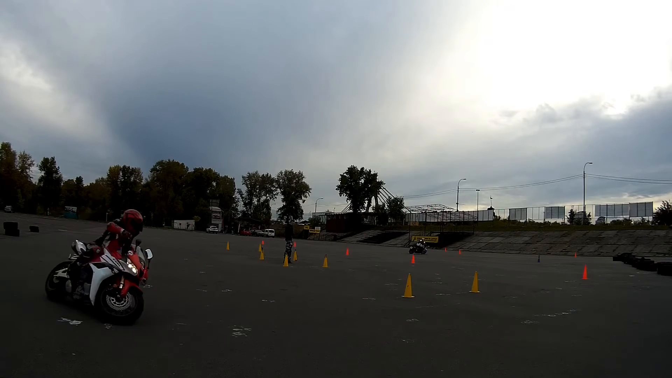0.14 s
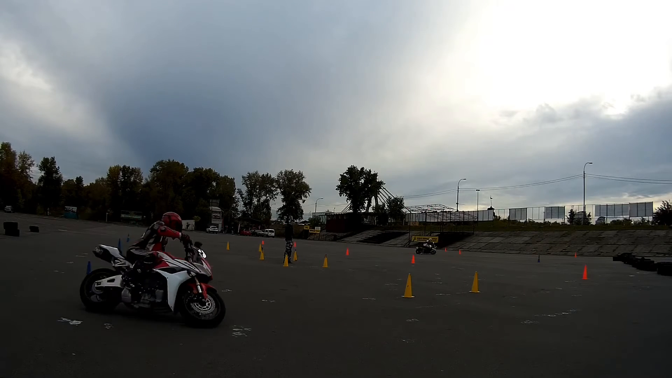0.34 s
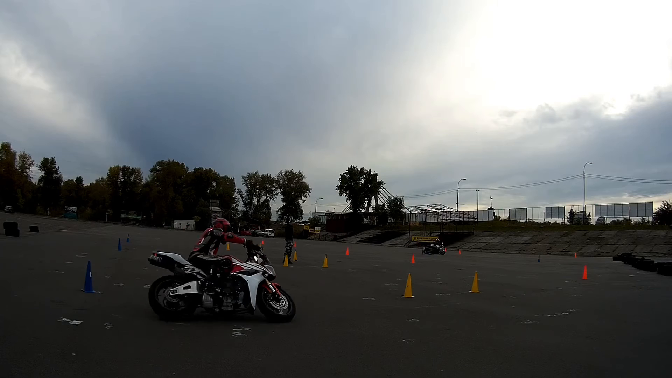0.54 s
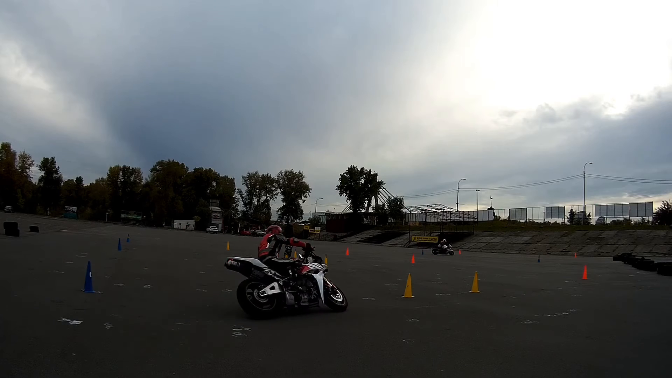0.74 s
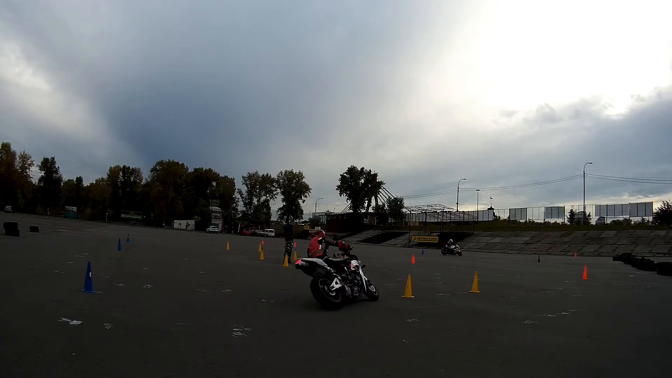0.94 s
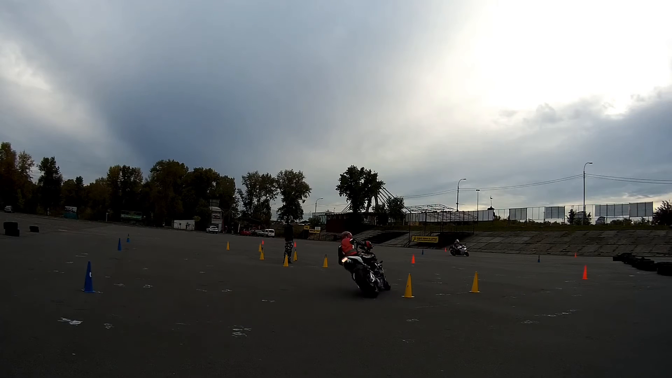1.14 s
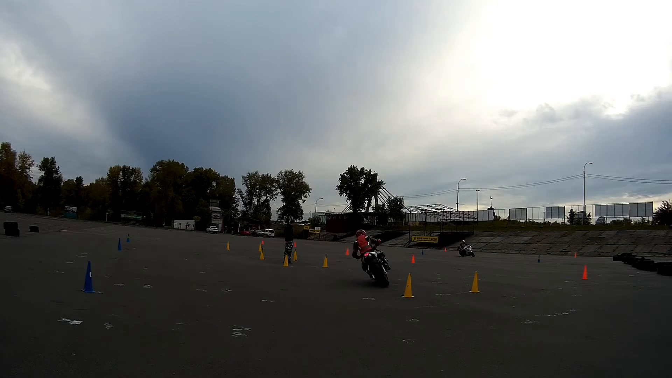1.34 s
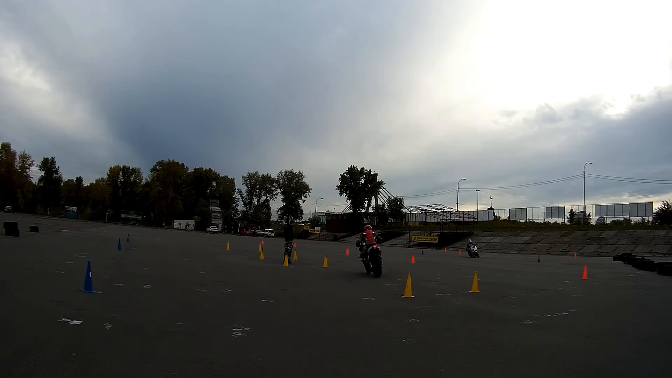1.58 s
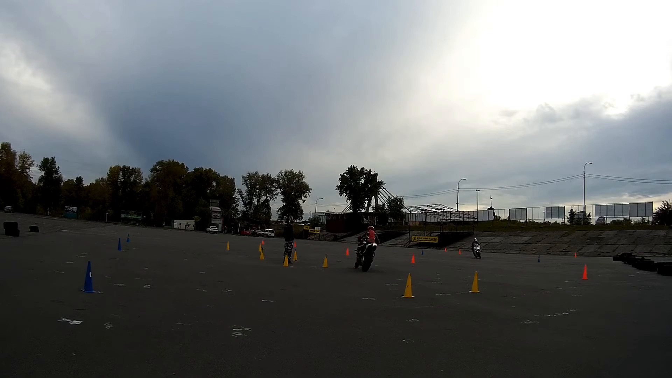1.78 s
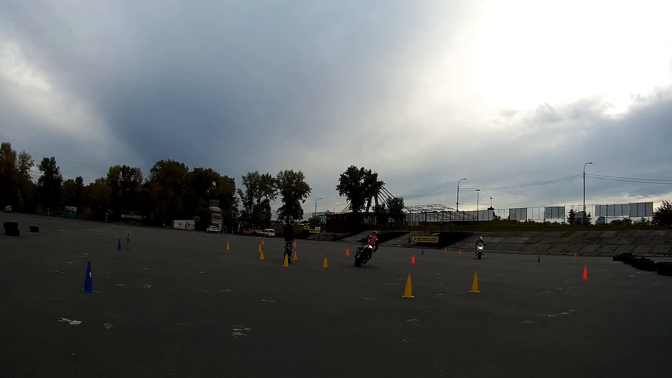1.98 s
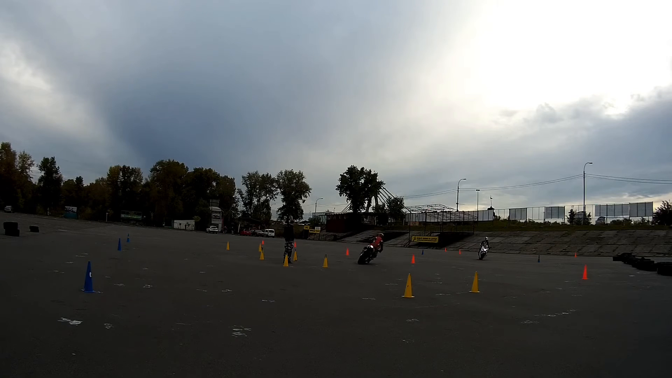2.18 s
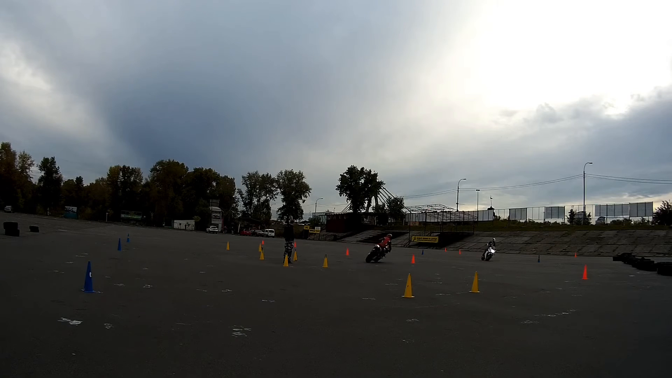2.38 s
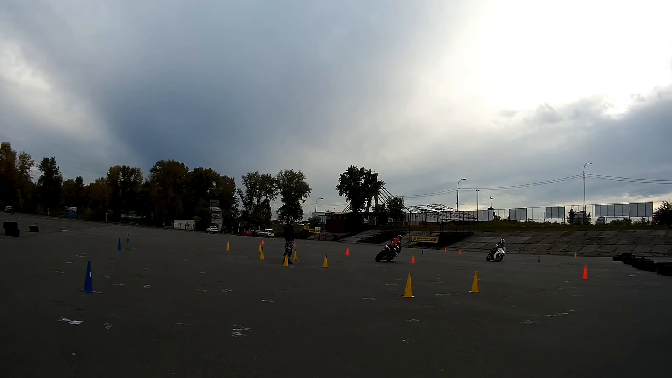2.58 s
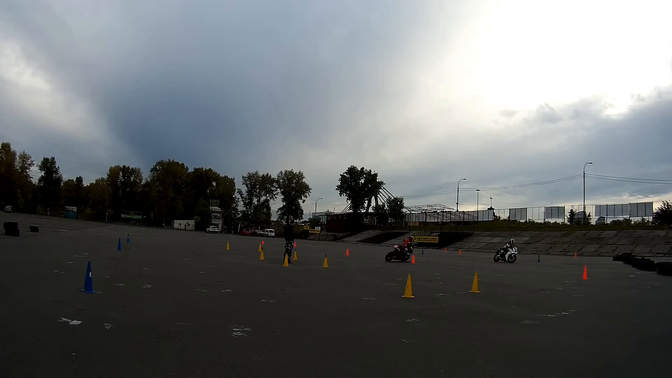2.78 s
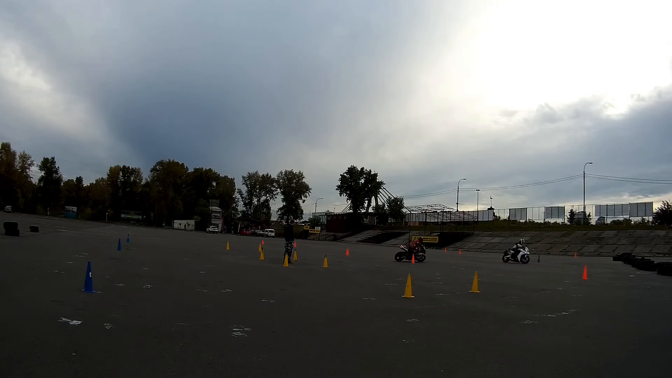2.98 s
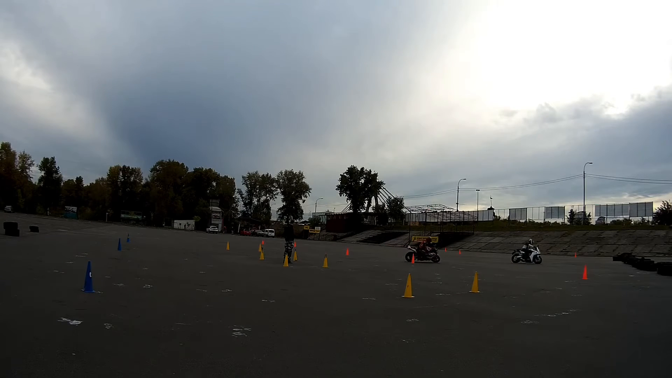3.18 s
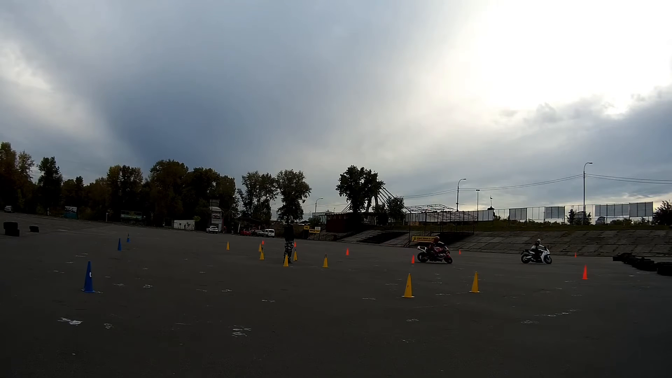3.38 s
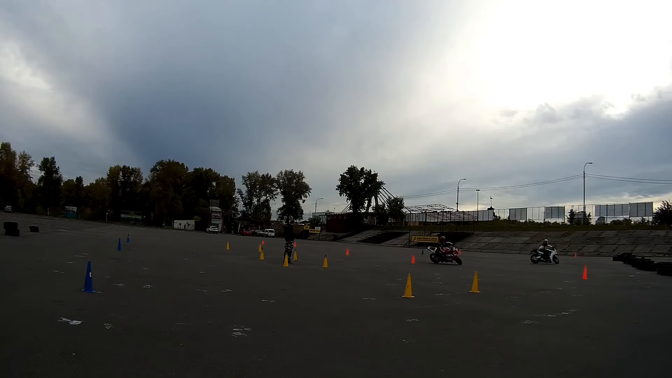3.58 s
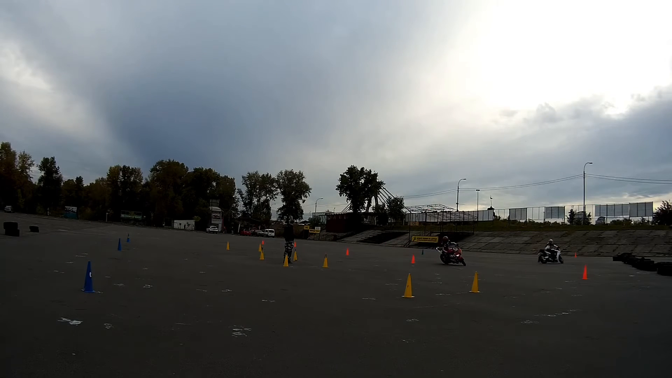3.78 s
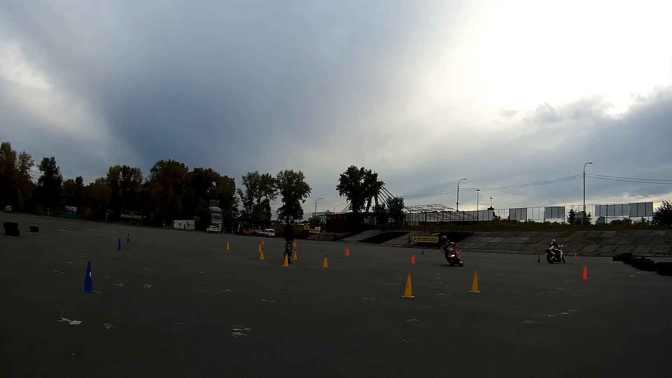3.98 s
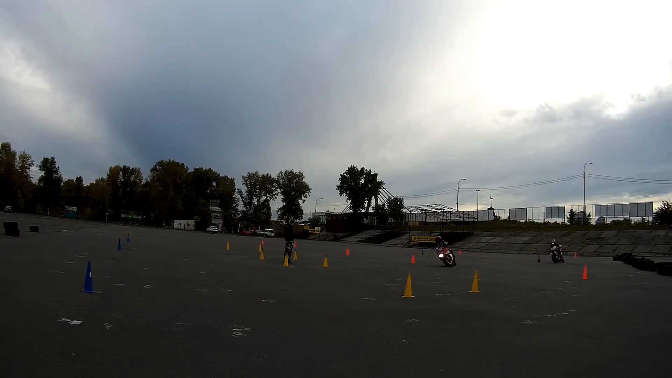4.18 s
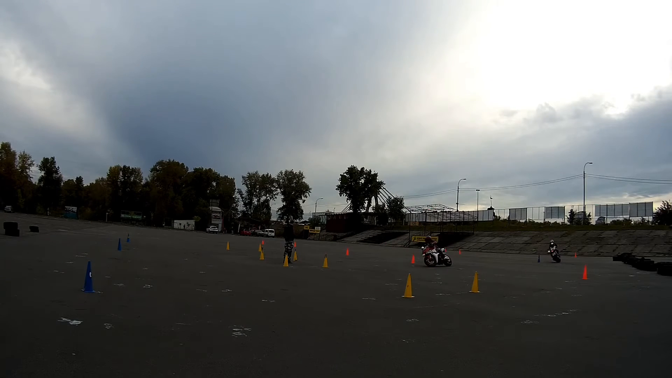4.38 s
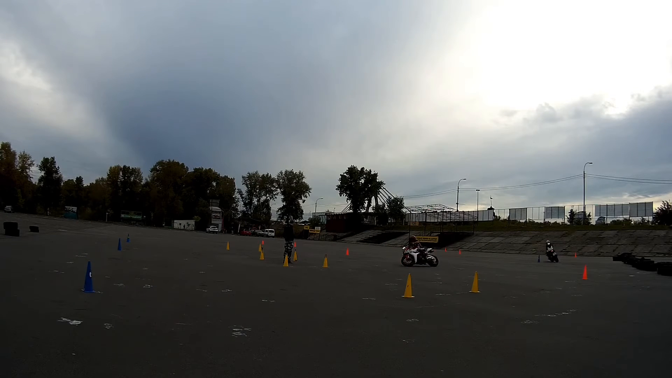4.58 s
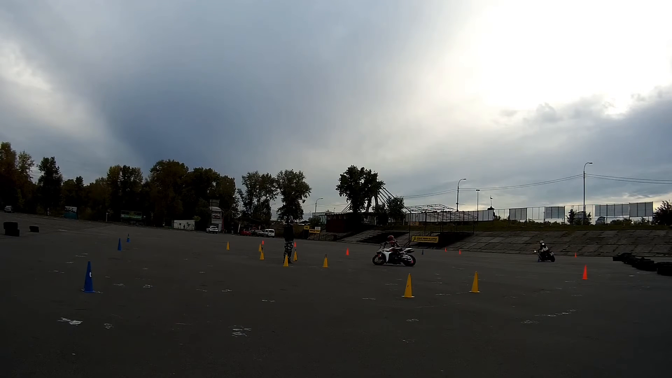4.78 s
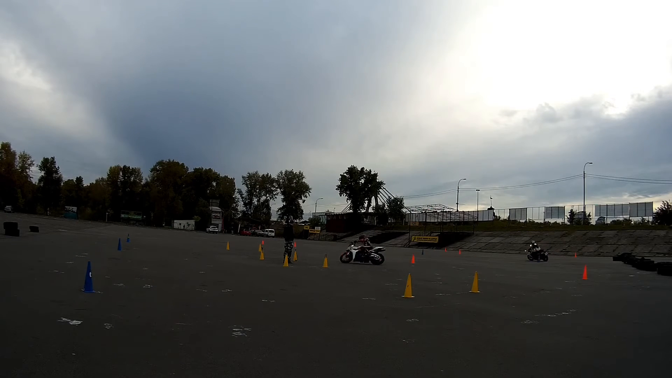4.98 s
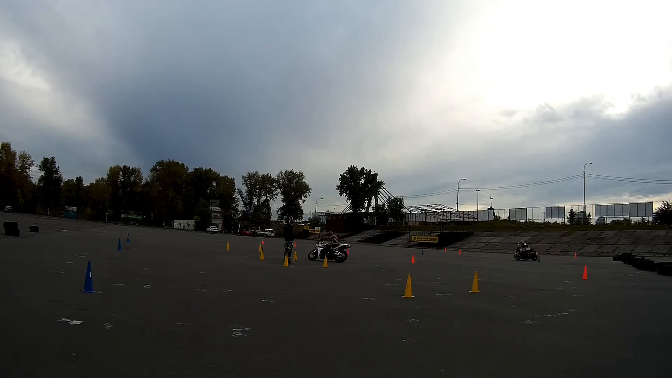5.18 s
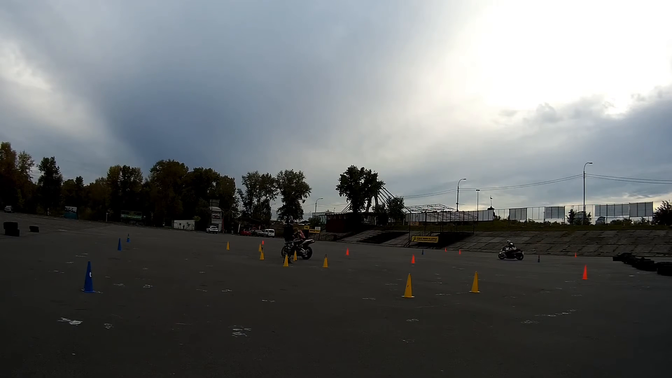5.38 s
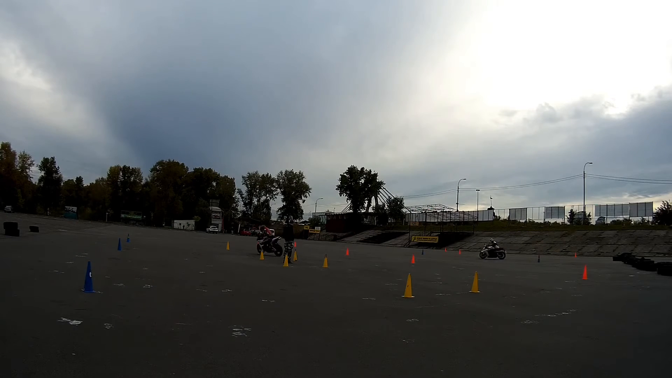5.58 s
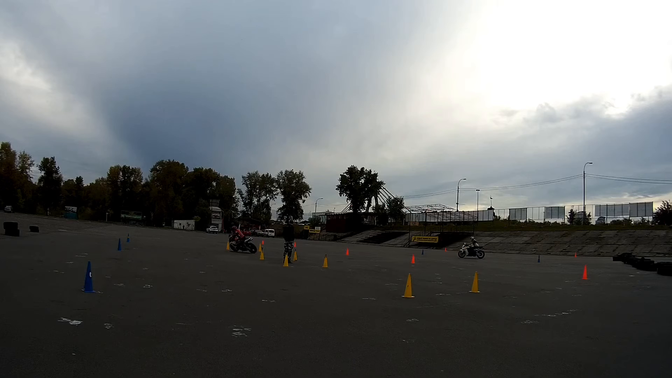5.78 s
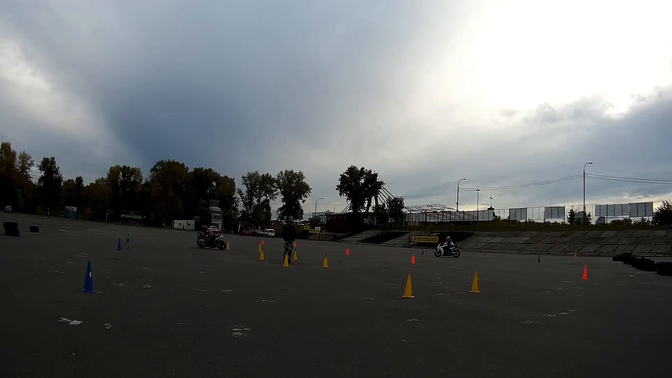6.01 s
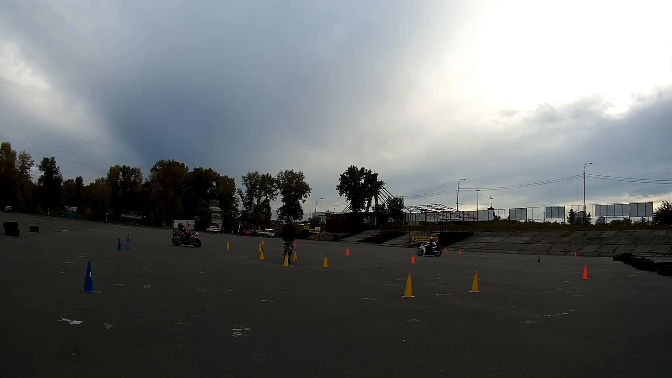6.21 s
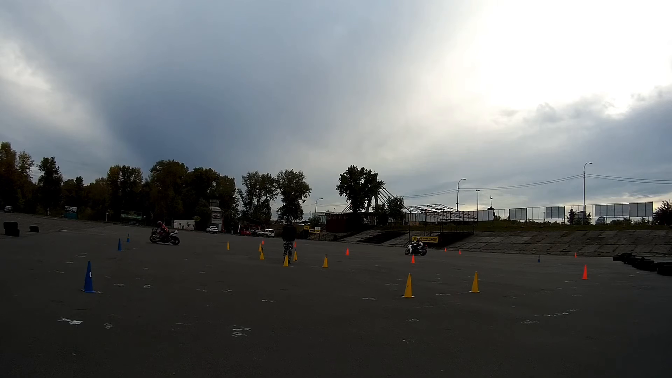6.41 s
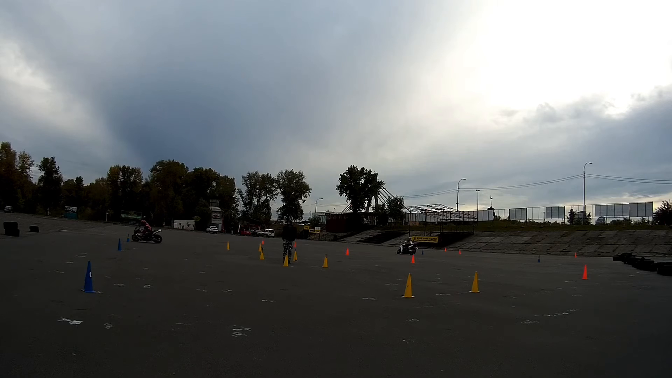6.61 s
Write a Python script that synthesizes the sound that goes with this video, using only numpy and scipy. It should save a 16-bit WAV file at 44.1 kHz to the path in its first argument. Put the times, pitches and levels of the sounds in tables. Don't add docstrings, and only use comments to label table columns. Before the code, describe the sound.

A sport bike's engine swells and rises in pitch during a close pass, with rough exhaust roar and thin chain whine, then snaps off the throttle and drops down. It idles low through a distant turn, revs again with short stabs and winds down. Muffled outdoor pickup, with little treble, low far-off engine and traffic murmur, light hiss and a brief faint electronic buzz near the end.

```python
import sys
import numpy as np
from scipy import signal
from scipy.fft import rfft, irfft
from scipy.io import wavfile
from scipy.ndimage import uniform_filter1d

SR = 44100
rng = np.random.default_rng(int(sys.argv[2]) if len(sys.argv) > 2 else 0)


def generate_wav(sig):
    pcm = np.round(np.clip(np.atleast_2d(sig).T, -1, 1) * 32767).astype(np.int16)
    wavfile.write(sys.argv[1], SR, pcm)


def volts_from_decibels(level):
    exponent = np.asarray(level, float) / 20
    return 10 ** exponent


N = 293265
T = np.arange(N) / SR


def evened(x):
    return x / np.sqrt(np.mean(x ** 2) + 1e-20)


def read(points, hz):
    f, value = np.transpose(points)
    return np.interp(np.log(hz + 1), np.log(f + 1), value)


def played(rows):
    s, *columns = np.transpose(rows)
    return [uniform_filter1d(np.interp(T, s, c), size=500, mode="nearest") for c in columns]


def noise(points):
    z = rfft(rng.standard_normal(N))
    gain = volts_from_decibels(read(points, np.fft.rfftfreq(N, 1 / SR)))
    return evened(irfft(z * gain, N))


def drift(hz):
    b, a = signal.butter(2, hz, fs=SR / 64)
    coarse = signal.lfilter(b, a, rng.standard_normal(N // 64 + 2))
    return evened(np.interp(np.arange(N) / 64, np.arange(len(coarse)), coarse))


def band_rms(x, lo, hi):
    sos = signal.butter(4, [lo, hi], "band", fs=SR, output="sos")
    return np.std(signal.sosfilt(sos, x))


# (frequency [Hz], gain [dB])
PIPE = [(40, -12), (100, -11.5), (180, -4), (250, -15.5), (300, -15.5), (365, -3), (420, -10), (490, -26),
        (600, -22), (700, -22), (850, -26.5), (1100, -37), (1700, -38.5), (2800, -54)]


def pipe_phase(hz):
    grid = np.abs(np.fft.fftfreq(8192, 1 / SR))
    lag = -signal.hilbert(np.log(volts_from_decibels(read(PIPE, grid)))).imag
    return np.interp(hz, grid[:4096], lag[:4096])


def stack(rate, levels):
    turns = 2 * np.pi * np.cumsum(rate) / SR
    total = 0
    for k, gain in levels:
        smear = 0.25 * max(k - 5, 0) ** 2
        phase = k * turns + pipe_phase(k * rate) + np.pi / 2 - smear
        total = total + np.sqrt(2) * gain * np.cos(phase)
    return total


# (time [s], firing rate [Hz])
SPEED = [(0, 80.4), (.16, 80.34), (.41, 98.05), (.59, 119.6), (1.13, 183.4), (1.33, 198.6), (1.92, 167.1),
         (2.18, 162.7), (2.85, 86.4), (3.1, 67.35), (4.02, 69.14), (4.2, 72.64), (4.4, 87.2), (4.83, 140),
         (5.17, 179.6), (5.55, 167.6), (6.12, 166.4), (6.65, 102.4)]
# (time [s], added rate [Hz])
RELEASE = [
    (1.33, 0),
    (1.4, 6),
    (1.445, 0.5),
    (1.48, -8),
    (1.7, 0),
]
# (start [s], rise [s], hold [s], fall [s], added rate
# [Hz])
BLIPS = [
    (1.951, 0.0999, 0.15, 0.07954, 10.1),
    (3.281, .26, .08, .38, 8.8),
    (4.236, .05, 0.0499, 0.0873, 4.07),
    (5.857, 0.0936, 0.15, 0.1008, 16),
]


def revs():
    blips = [np.interp(T, np.cumsum(row[:4]), [0, 1, 1, 0]) for row in BLIPS]
    added = sum(blip * row[-1] for blip, row in zip(blips, BLIPS))
    return played(SPEED)[0] + played(RELEASE)[0] + added, sum(blips)


# (frequency [Hz], width [Hz], gain [dB])
MUFFLER = [(72, 30, -14.5), (103.6, 24.8, -2), (140, 110, -1), (184.2, 37.7, 2.5), (214, 91, -11),
           (247, 98, -3), (277, 56, -13.5), (350.3, 46, 2), (393, 25, -2)]


def muffler_db(hz):
    power = sum(volts_from_decibels(2 * db) / (1 + (2 * (hz - f) / width) ** 2) ** 2 for f, width, db in MUFFLER)
    return 10 * np.log10(power)


# (time [s], strength [0-1], extra path [ms])
GROUND = [(0, 0.25, 0.84), (.4, 0.66, 0.74), (.9, 0.56, 0.69), (1.25, 0.61, 0.52), (1.5, 0, 0.37),
          (4.5, 0.09, 0.35), (6.65, 0.21, 0.32)]


def ground(x):
    strength, path_ms = played(GROUND)
    dull = uniform_filter1d(x, size=15)
    return x + np.clip(strength, 0, 1) * np.interp(T - path_ms / 1000, T, dull)


def low_orders(rate, first_db, second_db, ragged):
    levels = [(1, volts_from_decibels(first_db)), (2, volts_from_decibels(second_db))]
    uneven_db = -22.5 + 4 * ragged
    for k in [i / 4 for i in range(2, 13) if i % 4]:
        kind_db = -9.5 * (2 * k % 1 > 0) + 4 * (k in (1.5, 2.5))
        fade_db = np.maximum(k * rate - 400, 0) / 10
        levels.append((k, volts_from_decibels(first_db + uneven_db + read(PIPE, k * rate) / 2 + kind_db - fade_db)))
    return stack(rate, levels)


PULSE_DB = [8.5, 6, 5, 4.5, 6.5, 0.5, 2.5, 0, -5, -3, -5, 2.5]


def upper_orders(rate, roar_db, throttle, facing, clean):
    bark_db = roar_db + 0.5 + 7 * throttle + 7 * facing + 4.5 * np.log2(rate / 100)
    levels = []
    for k, db in enumerate(PULSE_DB, start=3):
        rasp_db = 4 * clean * (k > 5)
        levels.append((k, volts_from_decibels(bark_db + db + rasp_db + read(PIPE, k * rate) + 2.8 * drift(5.4))))
        half = k + 0.5
        levels.append((half, volts_from_decibels(bark_db - 7 + read(PIPE, half * rate) + 4 * drift(5))))
    return ground(stack(rate, levels))


# (frequency [Hz], density [dB per Hz])
ROAR = [(300, -13.5), (480, -0.5), (700, 1.5), (1000, -3.5), (1400, -14), (1800, -19), (2400, -21.5),
        (2900, -34), (3300, -46.5), (4500, -110)]
# (frequency [Hz], density [dB per Hz])
RUMBLE = [(25, -31.5), (60, -23), (110, -6.5), (170, 8), (250, -1.5), (360, 5), (450, -14.5), (800, -29.5),
          (1500, -110)]
# (frequency [Hz], density [dB per Hz])
CLATTER = [(900, -38.5), (1250, -6.5), (1500, 2), (1850, -6.5), (2300, -31), (3500, -90)]


def roar_noise(rate, turns, ragged, clean):
    gate = 1 + 0.3 * np.cos(2 * np.pi * turns)
    flow = ground(noise(ROAR) * gate) * volts_from_decibels(-2 * clean)
    rumble_db = np.minimum(-5.5 + 16 * ragged, 7)
    clatter_db = -14 - np.log2(rate / 100) + 2 * drift(10)
    return flow + volts_from_decibels(rumble_db) * noise(RUMBLE) + volts_from_decibels(clatter_db) * noise(CLATTER) * gate


def muffled_db(hz):
    return 14 * np.log2(np.maximum(hz / 1350, 1))


CHAIN_ORDERS = [5.67, 8.5, 11.33]
CHAIN_DB = [-14, -14, -19]


def chain_whine(rate, throttle, ragged):
    wavering = rate * (1 + 0.004 * drift(30))
    load_db = 3 * throttle - 7 * ragged
    levels = [(k, volts_from_decibels(db + load_db - muffled_db(k * rate) + 3 * drift(9)))
              for k, db in zip(CHAIN_ORDERS, CHAIN_DB)]
    return stack(wavering, levels)


def port_ring(rate):
    mesh, mesh_db = 36, -33 + 1.5
    fade_db = -25 * np.maximum(mesh * rate - 5100, 0) / 1000
    gear = stack(rate * (1 + 0.008 * drift(60)), [(mesh, volts_from_decibels(mesh_db + fade_db + 2.5 * drift(12)))])
    port_hz, width_hz, port_db = 4550, 1800, -31 + 12
    port = signal.iirpeak(port_hz, port_hz / width_hz, fs=SR)
    excitation = gear + volts_from_decibels(port_db) * rng.standard_normal(N)
    return signal.lfilter(*port, signal.lfilter(*port, excitation))


# (time [s], roar [dB], throttle [0-1], tailpipe facing microphone [0-1], raggedness [0-1])
RIDE = [(0, -53.5, 0.87, 0.99, 0.4), (.3, -50.5, 0.79, 0.24, 0.3), (.55, -43.5, 0.65, 0.22, 0.5),
        (1.1, -42.5, 0.86, 0.51, 0.08), (1.4, -45, 0.73, 0.68, 0.4), (1.5, -50.5, .6, 0, 0.49),
        (2.18, -51.5, 0.47, 0.15, 0.99), (2.28, -49.5, 0.01, 0.38, 0.72), (2.75, -51.5, 0.38, 0.56, 0.66),
        (3.1, -52.5, 0.31, 0.56, 0.23), (4.22, -52, 0.35, 0.2, 0.49), (4.29, -55, 0.54, 1, 0.9),
        (4.6, -51.5, 0.53, 0.05, 0.33), (5.1, -46.5, 0.46, 0.63, 0.07), (5.35, -50.5, 0.14, 0.96, 0.3),
        (5.42, -49, 0.39, 0.01, 0.39), (6.12, -51.5, 0.34, 0, 0.6), (6.3, -51.5, 0.05, 0.16, 0.87)]


def engine():
    rate, blip = revs()
    roar_db, throttle, facing, ragged = played(RIDE)
    turns = np.cumsum(rate) / SR
    clean = np.clip(1 - 2 * ragged, 0, 1)
    cut_s, cut_half_s, cut_db = 1.452, 0.032, -6
    dip_db = cut_db * np.exp(-((T - cut_s) / cut_half_s) ** 2)
    blow_db = roar_db + 9.5 + 15 * throttle + 0.5 * blip + dip_db
    first_db = blow_db + muffler_db(rate)
    second_db = blow_db - 8 + 8.5 * facing + muffler_db(2 * rate)
    exhaust = low_orders(rate, first_db, second_db, ragged)
    exhaust = exhaust + upper_orders(rate, roar_db, throttle, facing, clean)
    strength = np.interp(turns, np.arange(1200), rng.standard_normal(1200))
    strength = uniform_filter1d(strength, size=60)
    misfire = 0.012 + (0.17 - 0.012) * np.clip(ragged, 0, 1)
    exhaust = exhaust * (1 + misfire * strength)
    close = volts_from_decibels(np.minimum(0.8 * (first_db + 26), 0))
    mechanical = chain_whine(rate, throttle, ragged) + close * port_ring(rate)
    return exhaust + volts_from_decibels(roar_db) * (roar_noise(rate, turns, ragged, clean) + mechanical)


# (time [s], firing rate [Hz], level [dB])
SECOND = [
    (5.2, 82, -57),
    (5.3, 89.8, -53),
    (5.4, 97.76, -48.5),
    (5.55, 111, -56),
    (5.66, 117.8, -61),
]


def second_bike():
    rate, db = played(SECOND)
    start, end = SECOND[0][0], SECOND[-1][0]
    on = np.interp(T, [start - 0.05, start, end, end + 0.068], [0, 1, 1, 0])
    levels = [(k, volts_from_decibels(db - 3 * (k - 1) + read(PIPE, k * rate) * (k > 1))) for k in range(1, 6)]
    return on * stack(rate, levels)


# (time [s], level [dB])
KNOCKS = [
    (1.469, -38),
    (5.375, -39),
    (5.487, -43),
]
# (frequency [Hz], level [dB], t60 [s])
KNOCK_MODES = [(114, 2.5, 0.011), (232, -4, 0.014), (298, 6, 0.056), (404, 6.5, .1)]


def knocks():
    t, blows = T[:8000], np.zeros(N)
    ring = sum(volts_from_decibels(db - 60 * t / t60) * np.sin(2 * np.pi * hz * t) for hz, db, t60 in KNOCK_MODES)
    for s, db in KNOCKS:
        blows[round(s * SR)] = volts_from_decibels(db)
    return signal.oaconvolve(blows, ring * np.minimum(t / 0.0049, 1))[:N]


# (frequency [Hz], level [dB])
IDLER = [(48, -52.5), (72, -57), (96, -59)]


def idler():
    waver = np.cumsum(1 + 0.01 * drift(1.4)) / SR
    return sum(np.sqrt(2) * volts_from_decibels(db + drift(5.4)) * np.cos(2 * np.pi * hz * waver) for hz, db in IDLER)


# (frequency [Hz], density [dB per Hz])
LOT = [(15, -10), (30, -7.5), (45, -5.5), (100, 8.5), (200, 6), (400, -13), (800, -12), (1700, -17.5),
       (3000, -52), (4500, -110)]


def far_traffic():
    return volts_from_decibels(-47.5 + 1.5 * drift(1)) * noise(LOT)


def ducked_db(x):
    loud_db = 10 * np.log10(abs(uniform_filter1d(x ** 2, size=round(0.13 * SR))) + 1e-12)
    return np.clip(0.27 * (loud_db + 37.5), 0, 2.5)


# (frequency [Hz], density [dB per Hz])
HISS = [(200, -12.5), (3000, -1.5), (6000, -2.5), (9000, -2), (13000, -2.5), (14000, -3), (14500, -10.5),
        (15000, -34.5), (15300, -70)]
# (middle [s], half length [s], level [dB])
GUSTS = [(.62, .15, 1.5), (1.697, 0.16, -0.2), (2.62, 0.16, 1.5), (3.65, 0.18, 1), (4.662, 0.12, 1)]


def preamp_hiss(dry):
    hiss = noise(HISS)
    swell_db = sum(db * np.exp(-((T - s) / half) ** 4) for s, half, db in GUSTS)
    return hiss * volts_from_decibels(-73.5 + swell_db - ducked_db(dry[0])) / band_rms(hiss, 8500, 13100)


# (harmonic, level [dB])
BUZZ = [(3, -87), (4, -82), (5, -80), (6, -95), (7, -86), (8, -85), (9, -80), (10, -97)]


def buzz():
    pulse_hz = 1447.2 * (1 + 0.0012 * drift(40))
    turns = 2 * np.pi * np.cumsum(pulse_hz) / SR
    on = (T > 5.665) & (T < 6.06) & (abs(T - 5.92) > 0.012)
    lines = sum(np.sqrt(2) * volts_from_decibels(db) * np.cos(k * turns) for k, db in BUZZ)
    return on * volts_from_decibels(drift(20)) * lines


def scene():
    bike = engine()
    lot = far_traffic() / volts_from_decibels(1.2 * ducked_db(bike))
    return (bike + second_bike() + knocks() + idler() + lot)[None]


def low_pass(x):
    return signal.sosfilt(signal.butter(12, 15000, fs=SR, output="sos"), x)


def record(dry):
    mix = dry + preamp_hiss(dry) + buzz()
    return low_pass(mix)


dry = scene()
out = record(dry)
generate_wav(out)
```